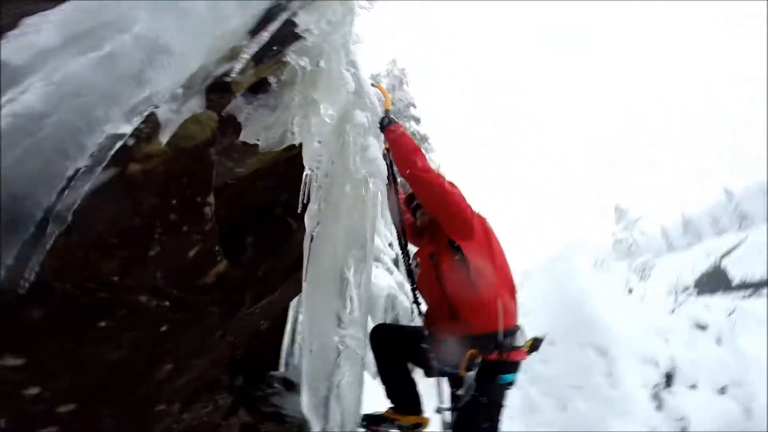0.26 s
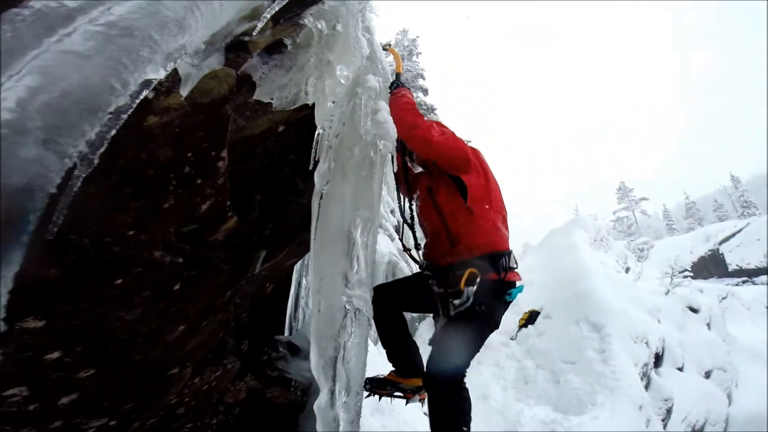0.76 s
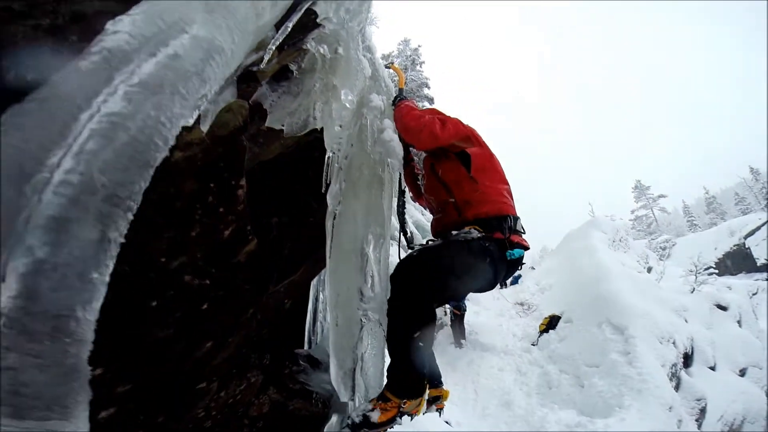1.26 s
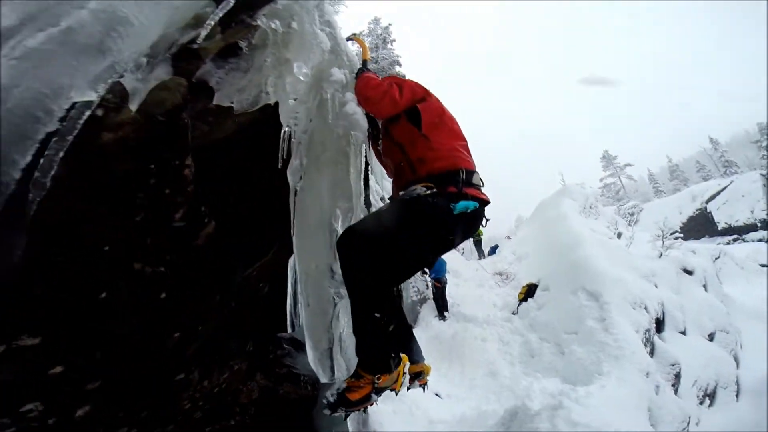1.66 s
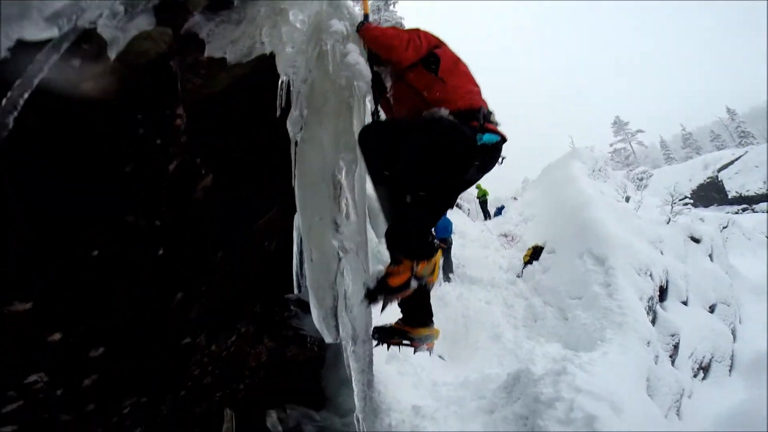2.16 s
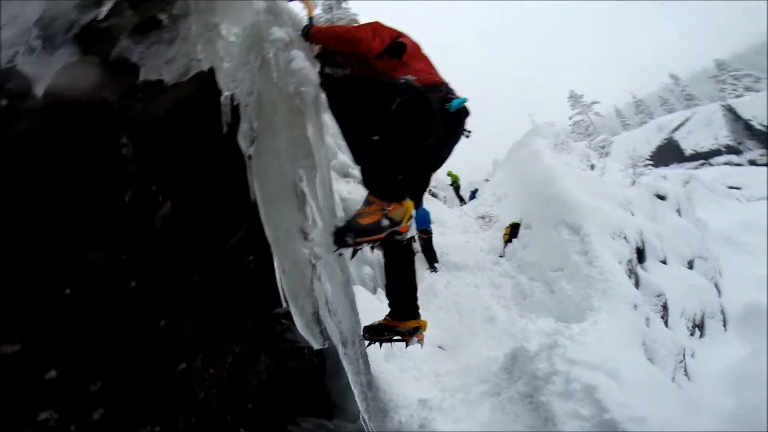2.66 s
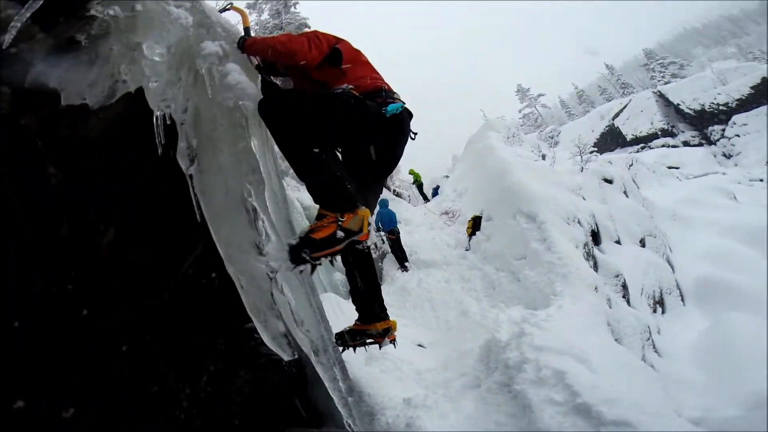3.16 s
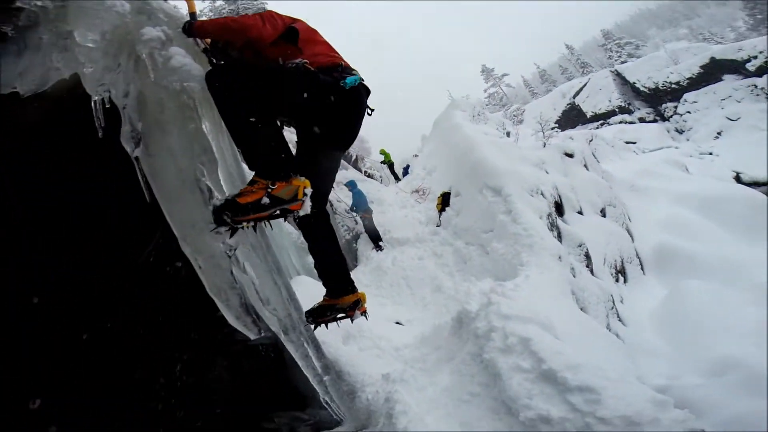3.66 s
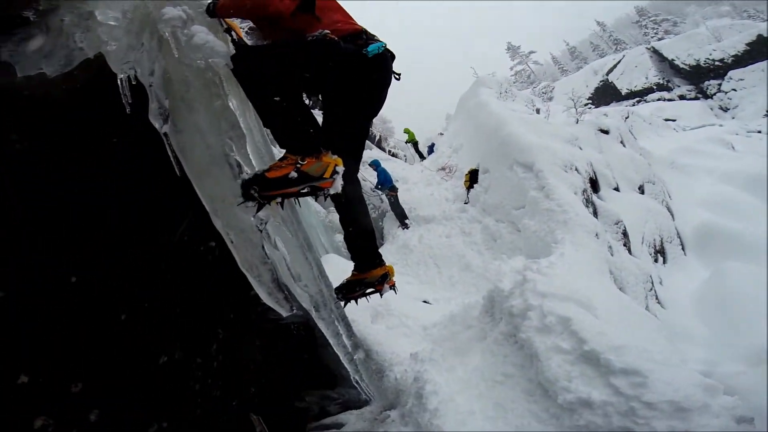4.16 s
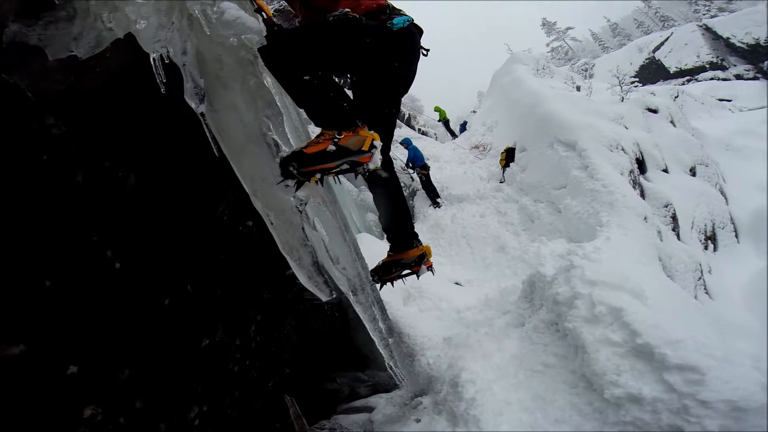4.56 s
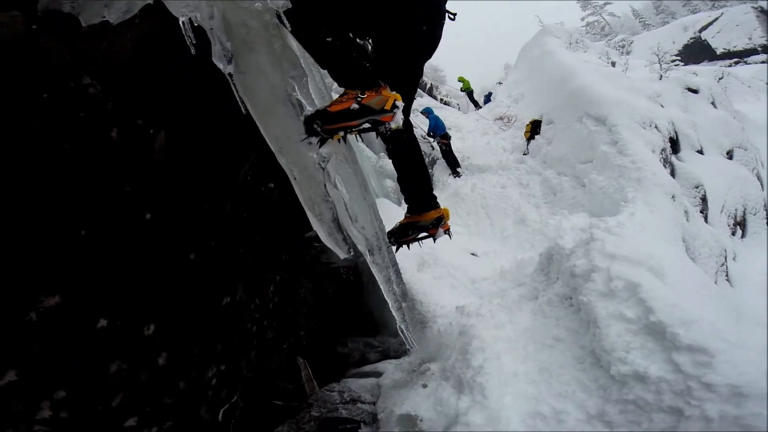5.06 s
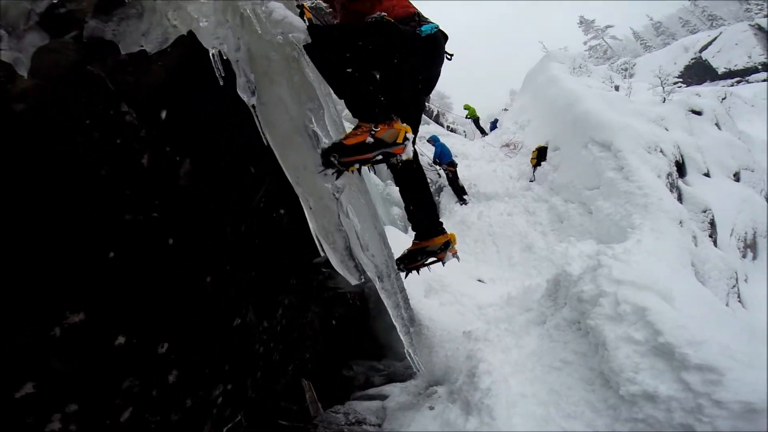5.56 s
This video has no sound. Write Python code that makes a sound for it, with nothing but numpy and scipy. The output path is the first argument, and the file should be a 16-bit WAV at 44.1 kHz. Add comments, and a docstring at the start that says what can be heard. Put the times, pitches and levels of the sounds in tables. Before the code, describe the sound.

Outdoors on a snowy slope, a climber's steel tool strikes ice immediately, with a clipped ring and a gust thumping the microphone. Boot spikes crunch densely in the first half second. After a quieter second, icicles snap sharply in clusters, with brief hollow dying tones and gritty trickle. The last seconds hold only sparse small clicks over faint wind and hiss. Close small camera microphone in a hard case, mono, boxy and dry.

```python
"""A climber's tool strikes at once with a short steel ring and after-ring, among dense crunches from spiked boots.
Wind rumbles on the camera case, gusty at first and then steadier, with a few single low pressure pulses.
Icicles crack with sharp snaps, loose pieces sound dying tones, and gritty rustle trickles to the end.
Ice is made of filtered snaps, noise and dying tones; the case colours its grit, shards and cracks
and the faint outside air. Hiss and a thin electronic whine lie under it all."""
import sys
import numpy as np
from scipy import signal
from scipy.fft import rfft, irfft
from scipy.io import wavfile
from scipy.ndimage import uniform_filter1d

SR = 44100
rng = np.random.default_rng(int(sys.argv[2]) if len(sys.argv) > 2 else 0)


def to_wav(s):
    """Save 16-bit WAV."""
    ch = np.atleast_2d(s).T  # columns
    pcm = np.round(np.clip(ch, -1, 1) * 32767)  # PCM
    wavfile.write(sys.argv[1], SR, pcm.astype(np.int16))


N = 256643

# Bands of the ice sounds, in the order body, dull, bright, top: (low edge [Hz], high edge [Hz])
BANDS = [(1900, 3500), (1000, 1900), (3500, 7500), (7500, 15900)]
THUD_HZ = (220, 1250)  # band in which the column of ice shakes


def amp(db):
    """Decibels to gain."""
    return 10 ** (np.asarray(db) / 20)


def evened(x):
    """Scales to rms 1."""
    return x / np.sqrt(np.mean(x ** 2) + 1e-20)


def add(mix, s, sound):
    """Mixes a sound in at time s."""
    part = mix[max(round(s * SR), 0):][:len(sound)]
    part += sound[:len(part)]


def band(x, lo_hz, hi_hz):
    """Causal band-pass."""
    return signal.sosfilt(signal.butter(3, [lo_hz, hi_hz], "bandpass", fs=SR, output="sos"), x)


def resonate(x, hz, width_hz):
    """A two-pole resonance of gain 1 at its centre."""
    return signal.lfilter(*signal.iirpeak(hz, hz / width_hz, fs=SR), x)


def noise(points):
    """Steady noise at rms 1, its spectrum drawn through points of (frequency [Hz], relative level [dB])."""
    f, db = np.transpose(points)
    hz = np.fft.rfftfreq(N, 1 / SR)
    gain = amp(np.interp(np.log(hz + 1), np.log(f), db))
    return evened(irfft(rfft(rng.standard_normal(N)) * gain, N))


def housing(x):
    """The direct sound plus the damped modes of the case around the microphone."""
    # Modes of the hard case: (frequency [Hz], width [Hz], relative level [dB])
    case_modes = [(1448, 156, 0), (1575, 126, 3), (2250, 315, 9.5), (2670, 400, 7), (3380, 295.3, 1.5),
                  (4140, 550, 1), (5765, 1330, 0), (6780, 1100, -0.5), (9500, 1800, -5),
                  (12100, 4700, -10.5)]
    t = np.arange(1024) / SR
    ring = np.zeros(len(t))
    for k, (hz, width_hz, db) in enumerate(case_modes):
        decay = width_hz / SR * np.exp(-np.pi * width_hz * t)
        ring += (-1) ** k * amp(db) * decay * np.sin(2 * np.pi * hz * t)  # neighbours alternate in sign
    return signal.oaconvolve(x, 2 * np.pi * ring)[:len(x)] + amp(-24.0) * x


def grit(per_s, spread_db, dust_db):
    """Snaps of uneven size over fine dust, through the housing; one signal per band, each at rms 1."""
    shape = len(BANDS), N
    size = amp(spread_db * np.minimum(rng.exponential(1, shape), 4)) * rng.choice([-1, 1], shape)
    snaps = evened(size * (rng.random(shape) < per_s / SR))
    dust = amp(dust_db) * rng.standard_normal(shape)
    snaps += 0.91 * snaps[0] + dust  # the first set of snaps reaches all bands
    return [evened(band(housing(x), *edges)) for x, edges in zip(snaps, BANDS)]


def shards(per_s, spread_db, count=18):
    """Small fragments, each a short dying tone at one of count pitches, through the housing; rms 1."""
    cycles = 45  # cycles until a fragment is 60 dB down
    t, out = np.arange(800) / SR, np.zeros(N)
    size = amp(spread_db * np.minimum(rng.exponential(1, N), 4))
    hits = size * (rng.random(N) < per_s / SR)
    kind = rng.integers(0, count, N)
    for k, hz in enumerate(np.geomspace(1140, 7503, count)):
        tone = amp(-60 * t * hz / cycles) * np.sin(2 * np.pi * hz * t)
        out += signal.oaconvolve(hits * (kind == k), tone)[:N]
    return evened(housing(out))


def tool():
    """Splintering ice drives the modes of the steel; the bite then chokes them."""
    # Steel modes: (frequency [Hz], half the width of each of two filter passes [Hz], relative level [dB])
    steel_modes = [(1660, 33, -2.5), (1950, 180, -2), (2640, 37, -4.5), (3280, 70, -10.5),
                   (3600, 50, -12.5), (5220, 250, -13), (5800, 480, -14)]
    drive_s, level_db, choke_t60 = 0.011, -8.5, 0.0061  # seconds, dB rms while driven, seconds
    t = np.arange(3000) / SR
    drive = rng.standard_normal(2 * len(t))
    ring = np.zeros(len(t))
    for hz, width_hz, db in steel_modes:
        mode = resonate(resonate(drive, hz, 2 * width_hz), hz, 2 * width_hz)
        ring += amp(db) * evened(mode[len(t):])  # the first half only builds the ring up
    ring /= ring[:round(drive_s * SR)].std()
    out = np.zeros(N)
    add(out, 0, amp(level_db - 60 * np.maximum(t - drive_s, 0) / choke_t60) * ring)
    return out


def crunches():
    """Dense fractures while a spike is forced through the ice; they stop quickly when it bites."""
    # Crunches of crushed ice: (start [s], length [s], place of the peak [0-1], body level at the peak [dB],
    # dull, bright and thud levels re body [dB], ring of the chips [Hz])
    crunch_list = [(0, .014, 0.59, -21.5, 2.5, -8.5, -6.5, 5930),
                   (0.078, 0.036, 0.63, -35, -3.5, -15, -20, 6600),
                   (0.1131, 0.061, 0.36, -26.5, -3.5, -9.5, -18, 7200),
                   (0.278, 0.03, 0.51, -32.5, -9, -21, -13.5, 3890),
                   (.397, 0.016, 0.65, -42.5, -6, -18, -12, 3950),
                   (0.412, 0.03, 0.32, -30, -9, -10, -12, 5160),
                   (.509, 0.083, 0.21, -52.5, -7, -3.5, -18, 5500),
                   (0.56, 0.027, 0.45, -55.5, 8, -3, -13, 4030), (0.638, 0.038, 0.54, -47, 1, -8, -4, 3470),
                   (1.766, 0.045, 0.26, -50, -3, -12, -6.5, 3980),
                   (1.798, 0.012, 0.038, -24.5, -10, -9.5, -28, 4270),
                   (2.008, 0.023, .3, -49.5, -10, 0, -17, 6250),
                   (2.247, 0.038, 0.33, -51.5, -14, -12, -25, 3400),
                   (2.451, 0.014, 0.36, -45.5, -10, -2, -22, 6960),
                   (2.576, 0.028, 0.17, -47, -2.5, 0.5, -28, 4250),
                   (2.646, 0.071, 0.057, -43, -4.5, -3.5, -15.5, 4100),
                   (3.151, 0.019, .1, -45, 1, -7, 0, 3400), (3.61, 0.16, 0.066, -50, -23, -4, -13, 3360),
                   (3.862, 0.036, 0.21, -59.5, -3.5, -1, 3, 3500),
                   (4.49, 0.043, 0.93, -52.5, -21, -35, -20, 3500),
                   (5.472, 0.1, 0.16, -64.5, -8, -1, -17, 6500)]
    build_db, ease_db = 21, 15  # slopes of the body before and after the peak, dB per crunch length
    brightening = 1.4  # bright and top swell this many times as far in dB as the body
    out = np.zeros(N)
    thud = evened(band(rng.standard_normal(N), *THUD_HZ))
    layers = grit(per_s=1200., spread_db=1.5, dust_db=-2.0) + [thud, shards(per_s=1100.0, spread_db=4.)]
    layers[3] = band(layers[3], BANDS[3][0], 10960) + amp(-6.) * layers[3]  # dust thins out at the very top
    lumps = amp(1.9 * evened(uniform_filter1d(rng.standard_normal(N), 90)))  # fractures come in uneven bursts
    for s, length, place, db, dull_db, bright_db, thud_db, chip_hz in crunch_list:
        a, place = max(round(s * SR), 0), np.clip(place, .01, .99)
        t = np.arange(round(length * SR) + 4000) / SR
        after = np.maximum(t - length, 0)
        tail = amp(-60 * after / 0.014) + amp(-29.5 - 60 * after / .2)  # quick stop, faint echo off the rock
        swell_db = np.interp(t / length, [0, place, 1], [-build_db * place, 0, -ease_db * (1 - place)])
        fade_in = np.minimum(t / .002, 1)
        shape = amp(db + swell_db) * tail * fade_in * lumps[a:a + len(t)]
        parts = [layer[a:a + len(t)] for layer in layers]
        parts[2] = parts[2] + amp(10.0) * resonate(parts[2], chip_hz, 0.046 * chip_hz)
        top_db = -14.5 + 0.28 * bright_db
        # body, dull, bright, top, thud, shards
        levels = (0, dull_db, bright_db, top_db, thud_db, -4.)
        extra = (0, 0, brightening - 1, brightening - 1, 0, 0)
        crunch = sum(amp(r + e * swell_db) * part for part, r, e in zip(parts, levels, extra))
        add(out, s, shape * crunch)
    return out


def rustle():
    """Clothing, rope and trickling grit in short clumps that start sharply, low and high partly apart."""
    # Level of the low grit before clumping: (time [s], level [dB])
    rustle_levels = [(0, -46), (.25, -40), (.4, -49.5), (.75, -59.5), (1.0, -76), (1.22, -61),
                     (1.32, -51.5), (1.5, -55), (1.9, -53), (2.7, -54), (3.18, -49.5), (3.3, -65.5),
                     (4.2, -57.5), (4.449, -54), (4.65, -61.5), (5.249, -65), (5.5, -63), (5.82, -63.5)]
    soft_db, loud_db, dulling = -54.5, -50.5, .75  # high grit drops away below soft and lags above loud
    t, (s, body_db) = np.arange(N) / SR, np.transpose(rustle_levels)
    bright_db = body_db + 1 - dulling * abs(body_db - np.clip(body_db, soft_db, loud_db))
    starts = (rng.random((2, N)) < 70. / SR) * 0.3 * rng.random((2, N))  # about 70 clumps a second
    clumps = 0.4 + signal.lfilter([1], [1, -np.exp(-1 / (0.0019 * SR))], starts)
    drift = uniform_filter1d(rng.standard_normal((2, N)), 1800)
    clumps *= amp(2.0 * evened(drift))  # the trickle thickens and thins
    body, dull, bright, top = grit(per_s=660.0, spread_db=1.5, dust_db=1.0)
    fragments = shards(per_s=270.0, spread_db=5.0)
    low = amp(np.interp(t, s, body_db)) * (body + amp(-3.0) * dull + amp(-3.0) * fragments)
    high = amp(np.interp(t, s, bright_db)) * (bright + amp(-9.0) * top)
    return clumps[0] * low + (0.57 * clumps[0] + 0.22 * clumps[1]) * high


def wind():
    """Lumpy low pressure on the port with a flutter above it; an opening gust settles, then slowly sags."""
    # Spectrum of the rumble: (frequency [Hz], relative density [dB per Hz])
    rumble_spectrum = [(7.1, -29.5), (12, 5.5), (43, 2), (55, -4.5), (70, -7.5), (92, -12.5), (200, -41),
                       (260, -67), (440, -120)]
    t = np.arange(N) / SR
    gust = np.exp(-t / .45)
    sag_db = .5 * t
    flutter = noise([(60, -26.0), (120, 2.5), (250, -4.0), (600, -11.5), (1500, -35)])
    gusts = evened(uniform_filter1d(uniform_filter1d(rng.standard_normal(N), 2500), 2500))
    quick = evened(uniform_filter1d(rng.standard_normal(N), 1000))
    lumps = amp(3.3 * gusts + 4.0 * quick)
    out = amp(-47. + 16.5 * gust - sag_db + 2.5 * gusts) * noise(rumble_spectrum)
    out += amp(-65 + 13 * gust - sag_db) * lumps * flutter
    return out


def air():
    """The quiet wash of the open slope, coloured by the housing."""
    wash = noise([(300, -11), (1500, 0.5), (6000, -2.5), (15000, -8.0)])
    return amp(-72) * evened(housing(wash))


def pressure_pulses():
    """Single low pressure pulses, perhaps lumps of wind: lopsided negative peaks with positive flanks."""
    # Low pressure pulses: (start [s], peak level [dB], half length [s])
    pulse_list = [(0.007, -17.5, 0.029), (0.314, -31, 0.0026), (0.426, -33, 0.0062), (0.478, -29, 0.019),
                  (0.579, -37.5, 0.0046), (0.671, -35, 0.017), (1.825, -34.5, 0.021), (2.6, -38, 0.0061),
                  (5.108, -37.5, 0.023)]
    skew, sharpness = .3, 8.  # the peak comes early by skew half lengths
    out = np.zeros(N)
    for s, db, half_length in pulse_list:
        u = sharpness * (np.linspace(-1, 1, round(2 * half_length * SR)) + skew) ** 2
        add(out, s, -amp(db) * (1 - u) * np.exp(-u))
    return out


def dying_tones():
    """Dying tones, roughened by rattle: the after-ring of the tool, then loose pieces of ice."""
    # Dying tones: (start [s], level before rattle and onset [dB], pitch [Hz], t60 [s])
    tone_list = [(0.012, -29, 1840, 0.12), (0.01, -31, 2720, 0.078), (1.612, -29, 1280, 0.053),
                 (2.035, -26.5, 2070, 0.029), (2.282, -31, 1420, 0.039), (2.456, -48, 855, 0.27),
                 (2.455, -35.5, 1383, 0.042), (2.453, -37.5, 2090, 0.084), (2.822, -28.5, 1598, 0.041),
                 (2.985, -49.5, 874, 0.077), (3.016, -52, 990, 0.073), (3.152, -47, 378, 0.21),
                 (3.158, -50, 1180, 0.074), (3.265, -47.5, 390, 0.083), (3.87, -57, 752, 0.14),
                 (4.581, -35, 1410, 0.016)]
    out, t = np.zeros(N), np.arange(12000) / SR
    for s, db, hz, t60 in tone_list:
        shake = min(hz / 1000.0, 1)  # low tones rattle less
        rattle = amp(3.47 * shake * evened(uniform_filter1d(rng.standard_normal(len(t)), 120)))
        wobble = 0.34 * shake * evened(uniform_filter1d(rng.standard_normal(len(t)), 200))  # radians
        onset = 1 - np.exp(-t / 0.0024)
        tone = np.sin(2 * np.pi * hz * t + wobble)
        add(out, s, amp(db - 60 * t / t60) * rattle * onset * tone)
    return out


def cracks():
    """A sharp snap, then splinters dying away at their own rate in each band; each chip has its own ring."""
    # Single cracks and chips: (time [s], body peak [dB], dull and top peaks re body [dB],
    # ring of the chip [Hz], t60 before the stretch of each band [s])
    crack_list = [(0.1166, -22, -10, -29, 3340, 0.052), (0.1267, -18, -3, -22, 3700, .035),
                  (0.1338, -16, -2.5, -22, 6700, 0.023), (.149, -21, -5.5, -22, 3500, 0.035),
                  (.173, -26.5, 4.5, -26, 3930, 0.016), (0.8031, -40.5, -4.5, -28, 3870, 0.08),
                  (0.9126, -45, -0.5, -22, 3600, 0.12), (1.143, -44.5, -3.5, -7, 4270, 0.044),
                  (1.238, -26.5, -6, -5.5, 4040, 0.072), (1.459, -35, -27, -4, 6600, 0.1),
                  (1.4825, -25, -11, -2.5, 6850, 0.1), (1.5387, -34, -8.5, -5, 5450, 0.059),
                  (1.55, -37, -16, -8, 5190, 0.046), (1.59, -18.5, -4, -21, 3920, 0.044),
                  (1.612, -25.5, -4, -31, 2900, 0.082), (1.6606, -39, 0, -33, 3280, 0.2),
                  (1.8063, -22, -21, -12, 4050, 0.081), (1.814, -24, -8.5, -17, 4250, 0.077),
                  (1.8947, -40.5, -25, -13, 4400, 0.061), (1.948, -36.5, -22, -17, 4240, 0.081),
                  (1.982, -47, 0, -1, 6600, 0.06), (2.0345, -44, 0, -17, 5800, .085),
                  (2.0567, -25.5, -5, -17, 4140, 0.085), (2.132, -34, 1.5, -18, 4200, 0.061),
                  (2.168, -38, -3, -18, 6300, .06), (2.218, -41, -15, -17, 4750, 0.046),
                  (2.2764, -30.5, -2.5, -19, 4050, 0.13), (2.431, -37.5, -2, -15, 3900, 0.19),
                  (2.6912, -29, -18, -9, 3360, 0.057), (2.709, -33, -30, -12, 3420, 0.079),
                  (2.717, -42, -23, -6, 5200, .05), (2.755, -30.5, -13, -14, 3380, 0.085),
                  (2.761, -46, -4, -6, 6470, 0.046), (2.8074, -39.5, -5, -3, 4900, 0.059),
                  (2.818, -31, -12, -0.5, 4760, 0.085), (2.877, -42.5, -15, -9, 4240, 0.05),
                  (2.885, -42.5, -19, -20, 3320, 0.052), (3.0336, -36, -33, -9, 5140, 0.088),
                  (3.268, -48.5, 6, -18, 3300, 0.062), (3.2898, -44, 2, -15, 3900, 0.064),
                  (3.329, -51, 2, -5, 3280, 0.026), (3.3516, -43.5, -18, 0, 4800, 0.04),
                  (3.4826, -50.5, 1.5, 2.5, 4350, 0.047), (3.5525, -43, -1, 10.5, 4940, 0.024),
                  (3.5878, -27.5, -4, -28, 3260, 0.078), (3.764, -44.5, -20, -10.5, 3380, .065),
                  (3.845, -59, -7, 15.5, 3520, 0.12), (4.242, -52.5, -11.5, 6.5, 5840, 0.045),
                  (4.2906, -40.5, -12, -15, 3320, 0.074), (4.3136, -43, -15, -8, 5670, .08),
                  (4.4759, -32.5, -32, -8.5, 4800, 0.033), (4.4812, -41, -5, 13, 3360, 0.012),
                  (4.562, -44.5, -6, -26, 4500, 0.072), (4.6375, -44.5, -22, 2, 7000, 0.03),
                  (4.89, -49, -15, -10, 4200, 0.075), (5.2674, -46.5, -2, -9, 6900, 0.03),
                  (5.519, -51, 4.5, -3, 4500, 0.045)]
    snap_at = 20  # samples from the first splinter to the break
    out, t = np.zeros(N), np.arange(5200) / SR
    for s, db, dull_db, top_db, chip_hz, t60 in crack_list:
        bright_db = 4.5 + 0.52 * top_db
        unevenness = amp(0.49 * rng.standard_normal(len(t) // 40).repeat(40))
        splinters = rng.standard_normal(len(t)) * unevenness
        splinters[snap_at] = 5.1  # the break itself
        splinters += amp(9.5) * resonate(splinters, chip_hz, 0.036 * chip_hz)
        # body, dull, bright, top, thud
        levels = (0, dull_db, bright_db, top_db, dull_db - 12.0)
        snaps = (2.4, 2.5, 1.1, 1.7, 0.26)  # extra gain at the onset
        stretches = (1.23, 1.35, 0.89, 0.55, 2.1)  # times t60
        for edges, r, snap, stretch in zip(BANDS + [THUD_HZ], levels, snaps, stretches):
            onset = (1 + snap * np.exp(-t / 0.001)) * (1 - np.exp(-t / 0.00031))
            decay = amp(-60 * t / max(t60 * stretch, .004))
            part = band(housing(splinters * onset * decay), *edges)
            add(out, s - .0005, amp(db + r) * part / abs(part).max())
    return out


def scene():
    """All sources reach one microphone."""
    ice = crunches() + cracks() + rustle()
    return (tool() + ice + dying_tones() + air() + wind() + pressure_pulses())[None]


def record(dry):
    """Adds hiss and the thin whine of the electronics; then soft overload and the band limit."""
    # Tones of the electronics: (frequency [Hz], level [dB rms])
    whine_tones = [(5846, -82), (8780, -83.5), (11690, -86.5), (11719, -76.5), (14626, -83.5)]
    # Spectrum of the hiss: (frequency [Hz], relative density [dB per Hz])
    hiss_spectrum = [(90, -40), (150, -4), (300, -9.5), (860, -10), (2400, -11.5), (5700, -16.5),
                     (8000, -22), (11000, -28), (14500, -33), (15800, -35.5)]
    t = np.arange(N) / SR
    waver = np.cumsum(rng.standard_normal((len(whine_tones), N)), 1) * 0.0049  # drifting phase, radians
    whine = np.zeros(N)
    for (hz, db), phase in zip(whine_tones, waver):
        whine += np.sqrt(2) * amp(db) * np.sin(2 * np.pi * hz * t + phase)
    wet = dry + whine + amp(-61.5) * noise(hiss_spectrum)
    wet = np.tanh(wet)  # the input stage rounds off the loudest blow
    low_pass = signal.firwin(511, 15400, window=("kaiser", 9), fs=SR)
    return signal.oaconvolve(wet, low_pass[None], "same")


dry = scene()
out = record(dry)
to_wav(out)
```